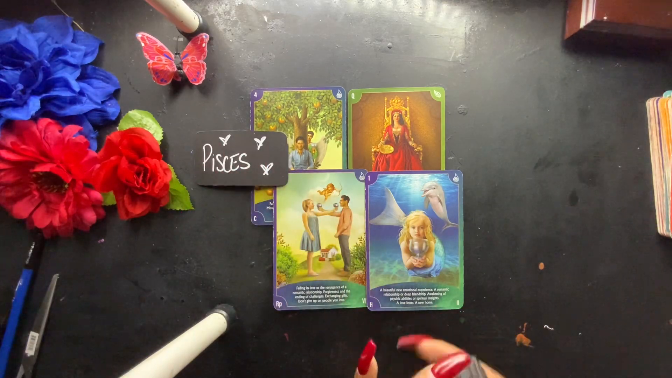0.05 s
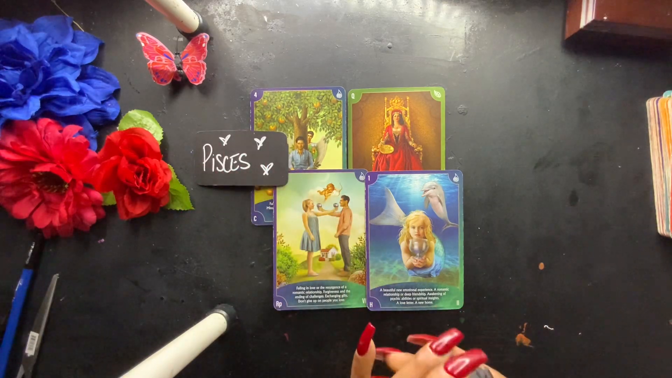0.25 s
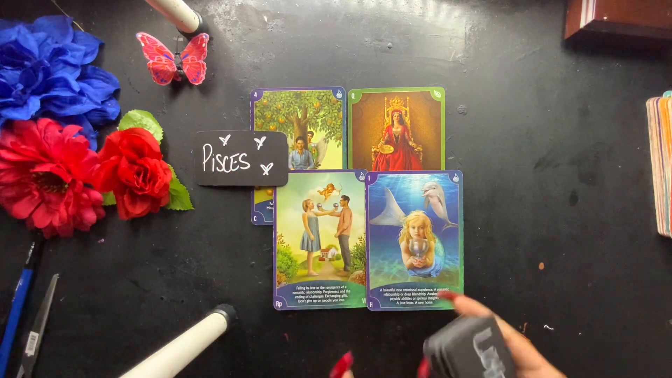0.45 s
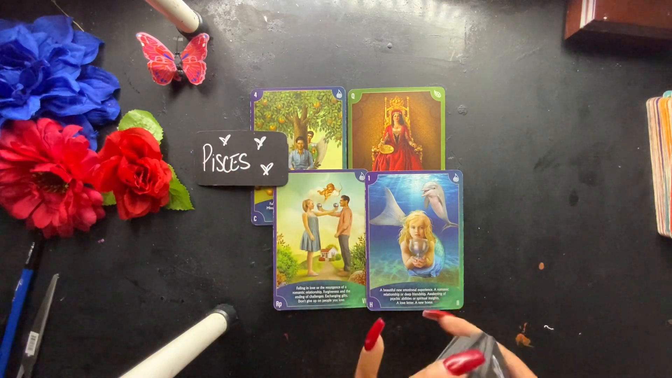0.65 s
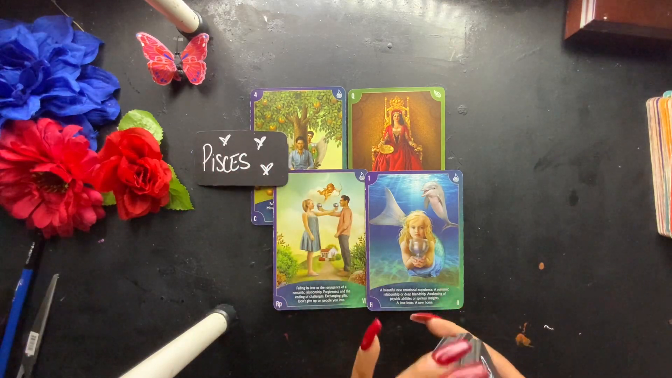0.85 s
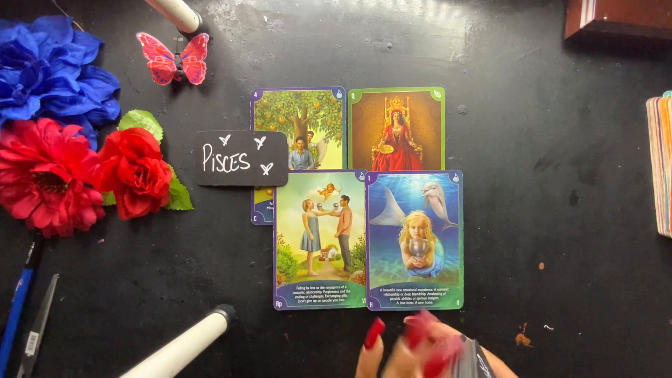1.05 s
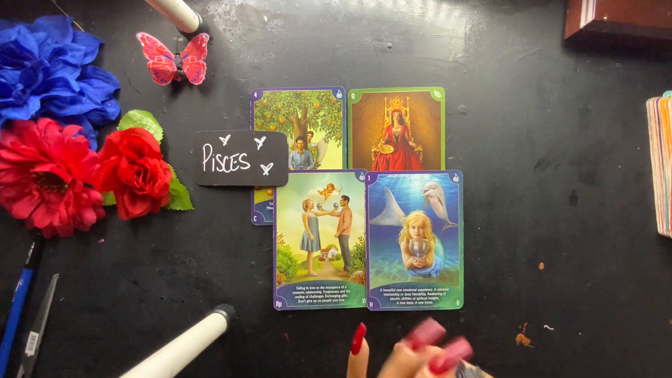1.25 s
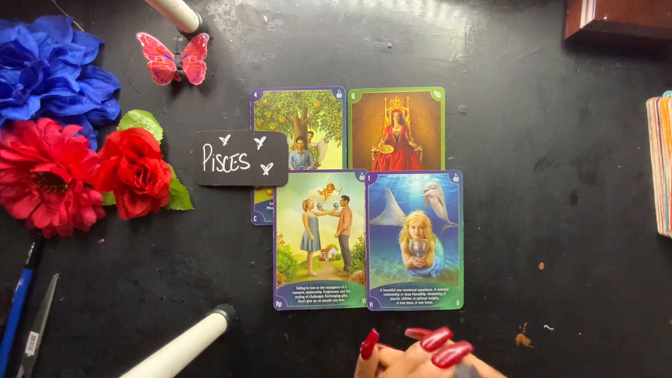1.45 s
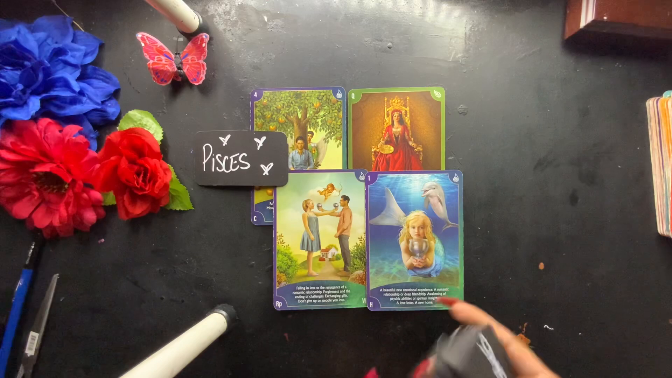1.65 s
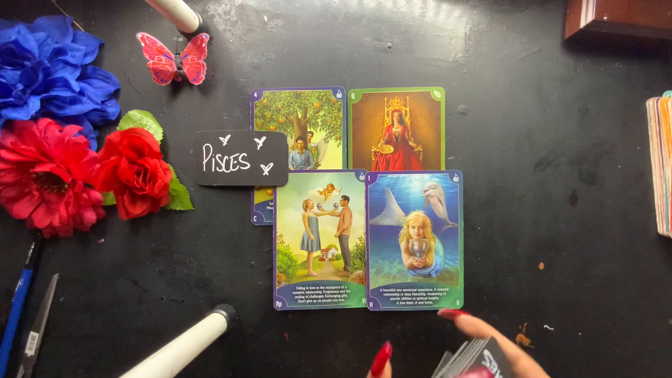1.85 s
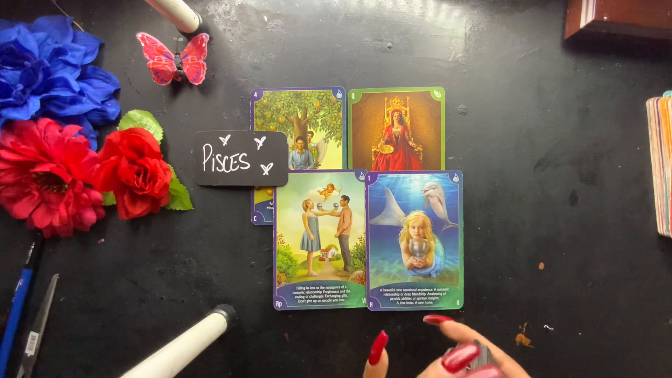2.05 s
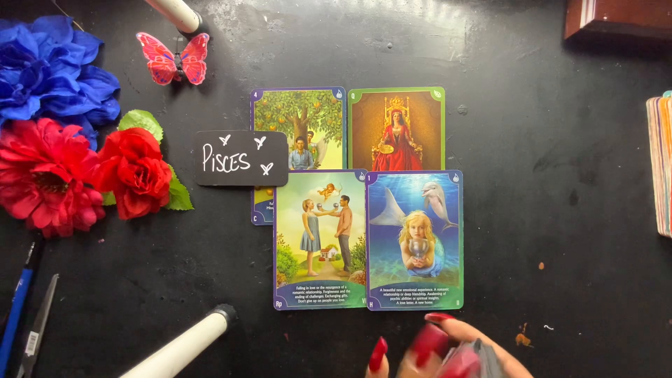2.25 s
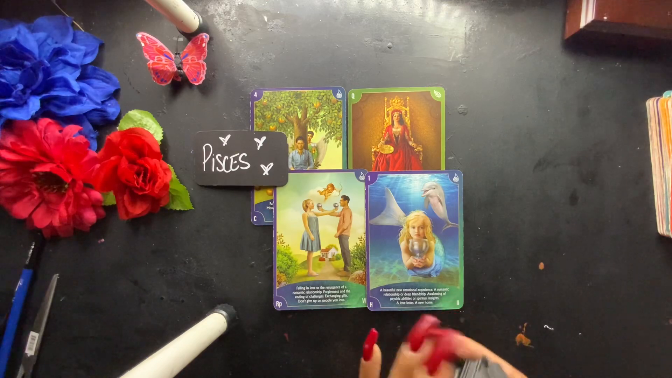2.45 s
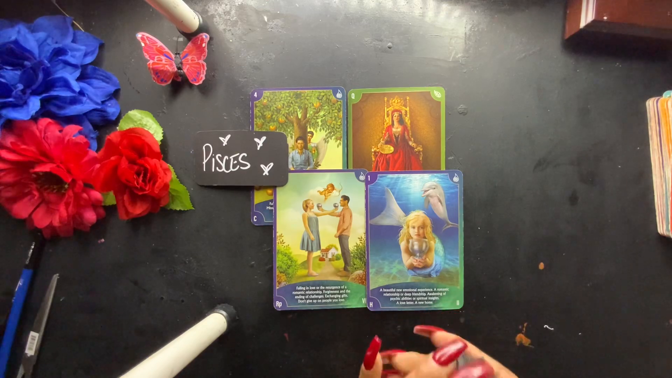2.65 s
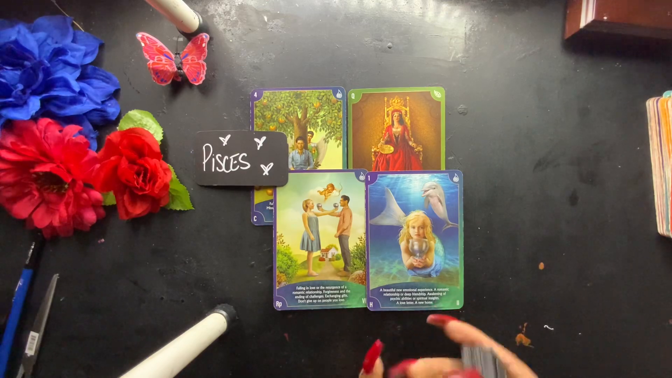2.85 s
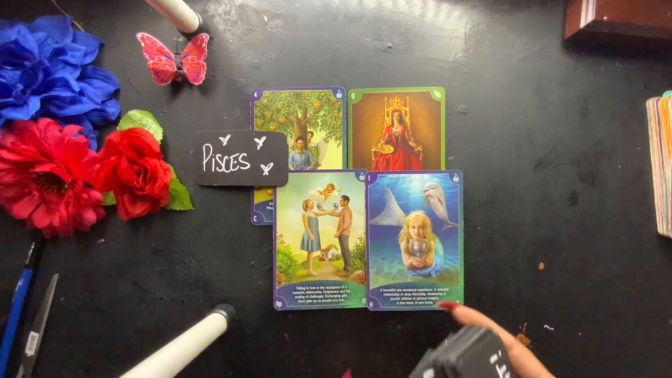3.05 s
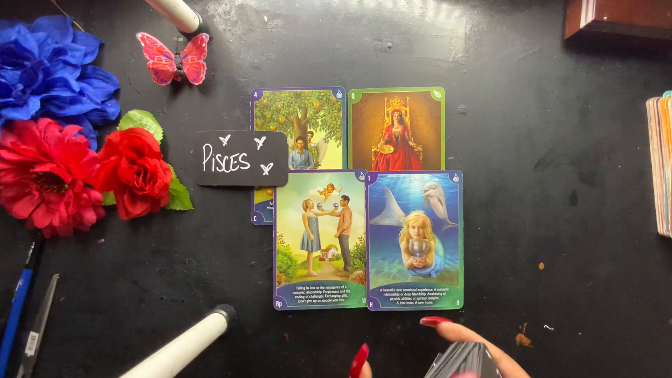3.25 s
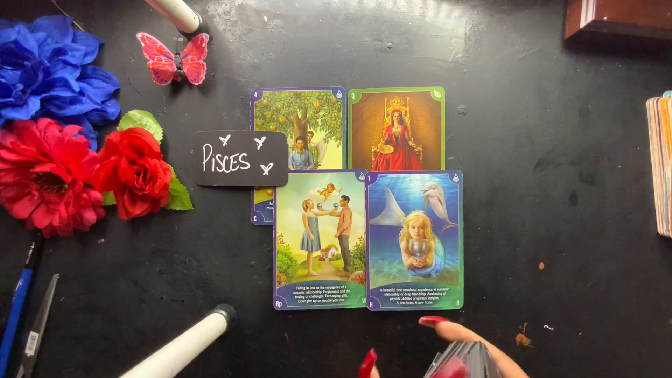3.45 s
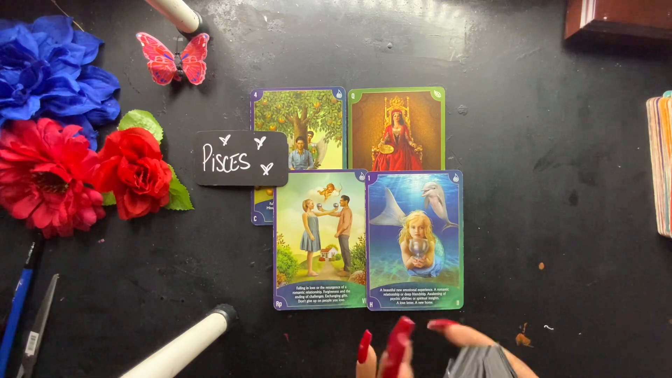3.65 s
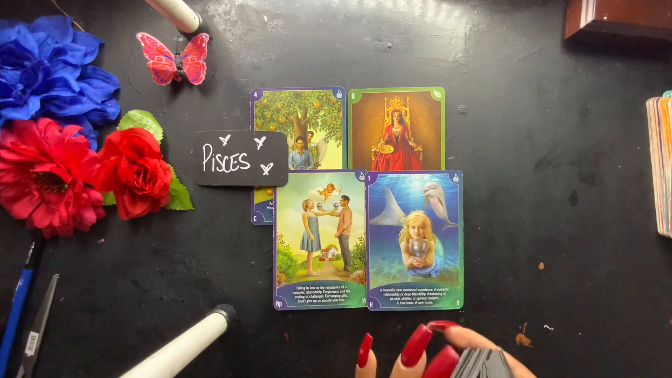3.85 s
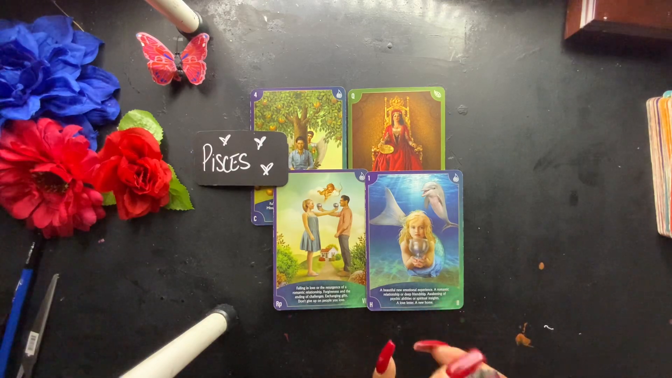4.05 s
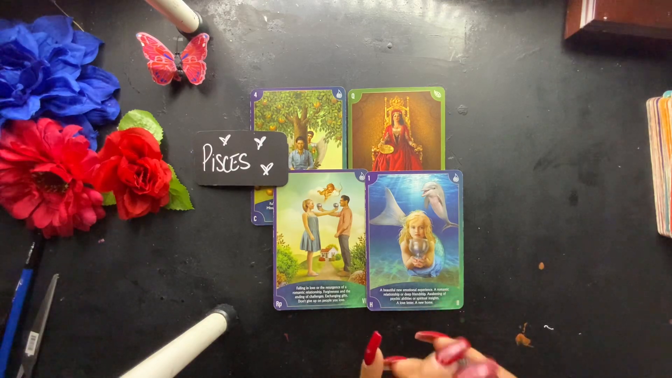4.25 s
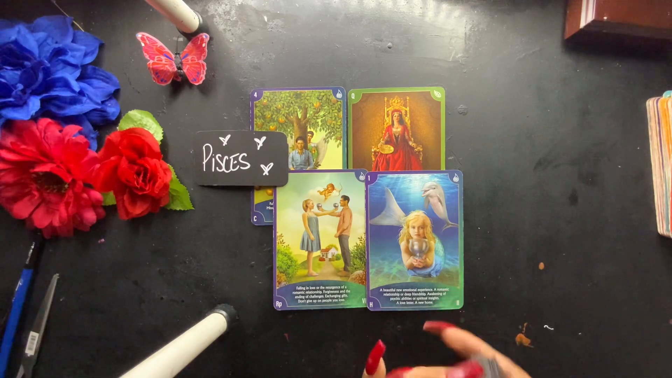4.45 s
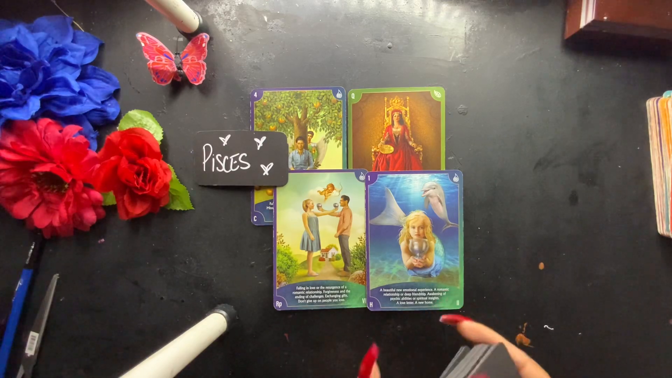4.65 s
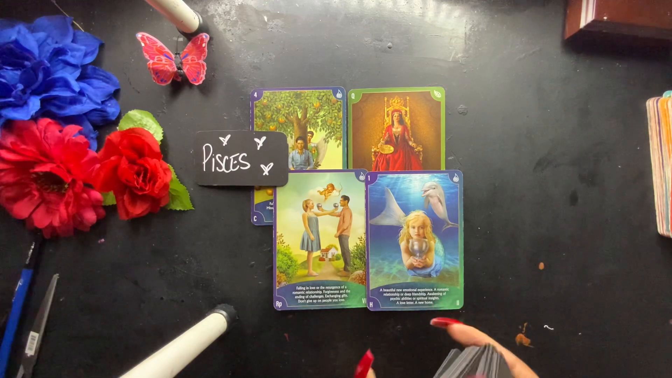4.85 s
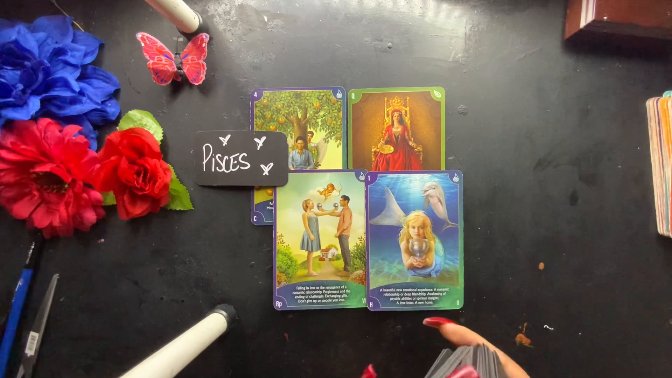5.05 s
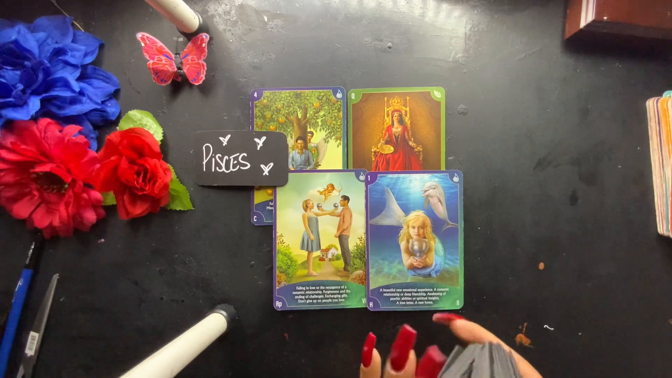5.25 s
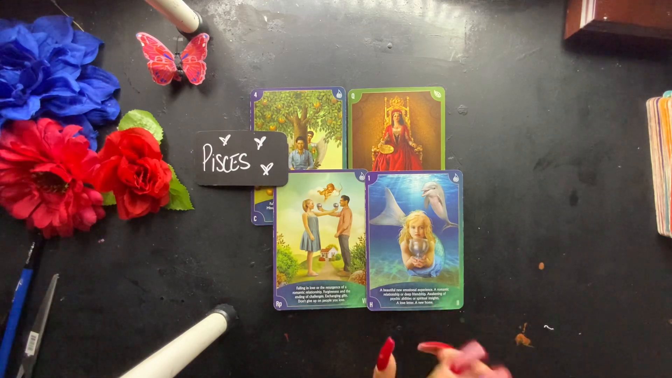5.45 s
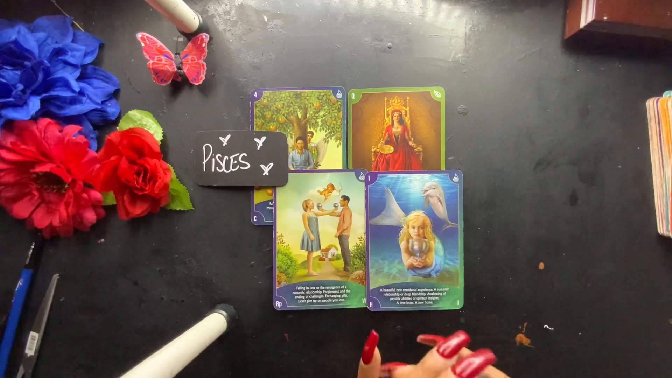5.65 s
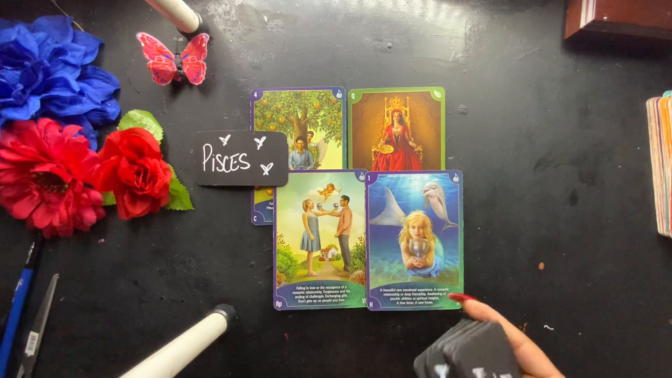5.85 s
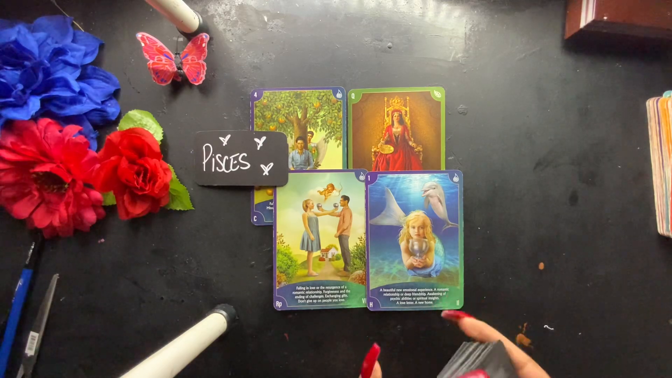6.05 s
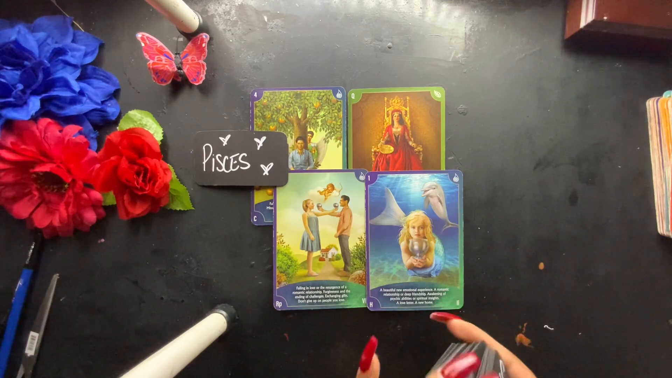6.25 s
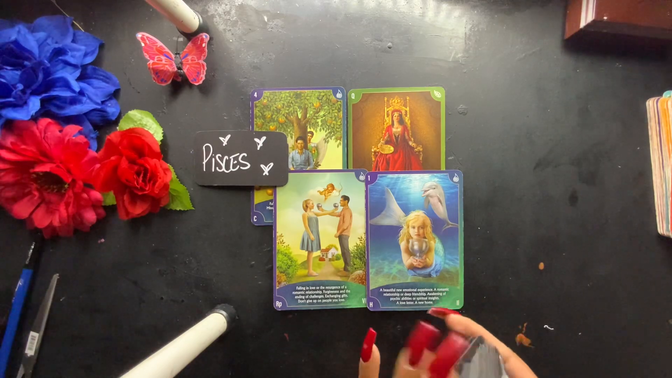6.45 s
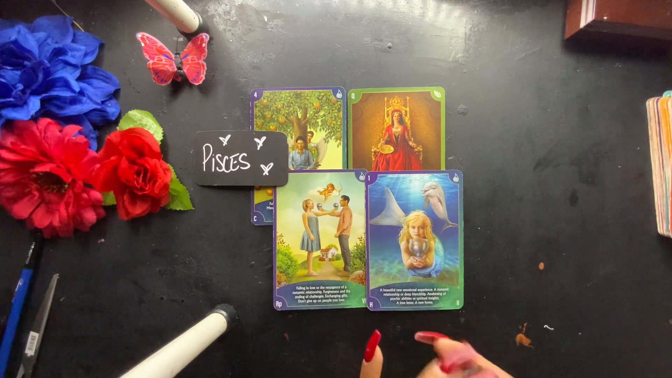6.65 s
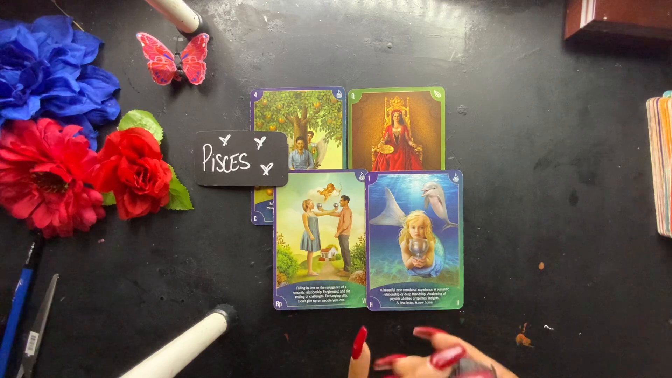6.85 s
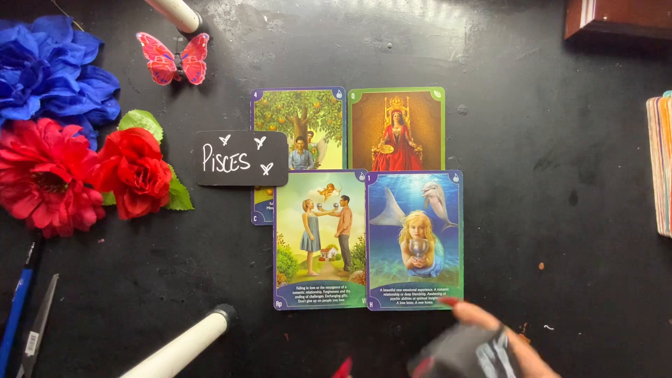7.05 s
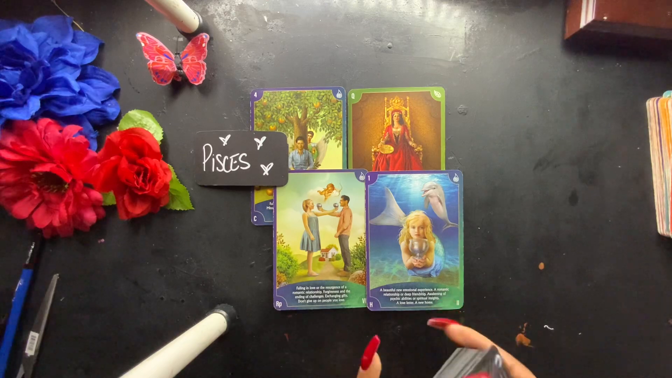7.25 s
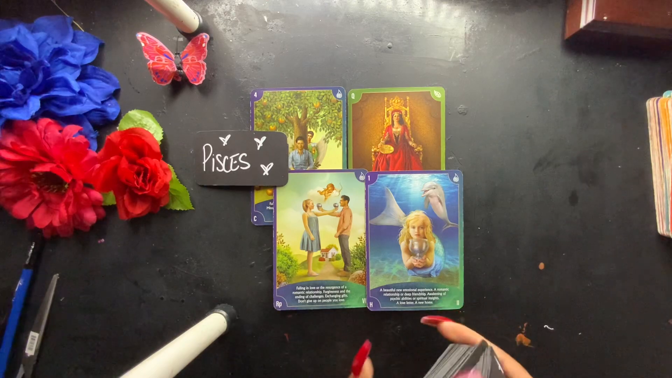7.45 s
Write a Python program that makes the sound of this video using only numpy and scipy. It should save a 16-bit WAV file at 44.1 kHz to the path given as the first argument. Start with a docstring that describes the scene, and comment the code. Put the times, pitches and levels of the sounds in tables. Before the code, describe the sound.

Close stereo pickup of a thick deck of coated cards shuffled overhand in a small quiet room. Faint skids and knocks come first, then short swishing draws end in crisp woody slaps, strongest near 1.7, 2.9, 4.5, 5.9, 6.0 and 7.1 seconds. Softer rasps, ticks and taps fill the gaps. The room answers briefly over a very low, steady rumble.

```python
"""Over a low rumble a packet of cards skids and knocks faintly; a thick deck is then shuffled overhand
just below a phone in a quiet room. Packets sliding over each other hiss and rasp (coloured noise) and slap
into the palm (noise bursts, a short sine knock of trapped air, a low thud). The small room answers briefly
(one reflection and a noise tail). The phone builds the treble of both sides from one signal."""
import sys
import numpy as np
from scipy import signal
from scipy.fft import rfft, irfft, next_fast_len
from scipy.io import wavfile
from scipy.ndimage import uniform_filter1d

SR = 44100
rng = np.random.default_rng(int(sys.argv[2]) if len(sys.argv) > 2 else 0)


def unload_wav(signal):
    """Save mono or channel-first audio to the path in sys.argv[1] as 16-bit WAV at rate SR, clipped to [-1, 1]."""
    wavfile.write(
        sys.argv[1],
        SR,
        np.round(np.clip(np.atleast_2d(signal).T, -1, 1) * 32767).astype(np.int16),
    )


def ratio(d):
    """dB to gain"""
    e = np.asarray(d, float) / 20
    return 10 ** e


N = 331014

# standing waves of the room: (frequency [Hz], width at -6 dB [Hz], level [dB])
ROOM_MODES = [(54.3, 21, 2), (71, 6.9, 1), (99.7, 21, -2.5), (146.6, 24.7, -1.5), (201.4, 40, -11),
              (254.2, 44, -6.5), (294, 22, -8.5), (350, 38, -19), (421.4, 42, -17)]
# colour of the faint air noise: (frequency [Hz], gain [dB])
AIR_COLOUR = [(90, -11.5), (250, 12), (330, 19), (430, 17), (500, 17.5), (650, 18.5), (900, 10.5),
              (1500, -2), (2200, -12), (4000, -2.5), (8000, -24), (16000, -23.5)]
RUMBLE_DB, AIR_DB = -62.5, -80

# packet drawn or nudged along the deck, rise and fall over 20 dB:
# (peak time [s], hiss level [dB], rise [ms], fall [ms], rasp relative to hiss [dB])
STROKES = [(0.217, -52, 69, 18, -3.5), (0.39, -39.5, 32.5, 22, -4.5), (0.914, -56, 88, 52, -0.5),
           (1.042, -42.5, 37, 37, -6.5), (1.432, -55, 23, 38, -3), (1.652, -39.5, 49, 14, -4.5),
           (2.28, -49.5, 14.5, 31, -4.5), (2.902, -35.5, 37.6, 15, -7), (3.293, -53, 75, 240, -0.5),
           (3.405, -56.5, 140, 110, -4.5), (3.519, -57, 34, 15, 9), (3.697, -48.5, 48, 100, -2),
           (3.815, -57, 130, 56, -1), (3.94, -56.5, 44, 130, 3), (4.159, -51.5, 92, 60, -6.5),
           (4.233, -55.5, 47, 79, -0.5), (4.488, -41, 52, 46, -7), (4.995, -54, 240, 70, -6),
           (5.119, -43.5, 58, 46, 0), (5.39, -52, 32, 48, -5), (5.641, -56, 67, 44, -1.3),
           (5.706, -59.5, 18, 72, -2.5), (5.84, -34, 45, 13, -8.5), (6.468, -50.5, 64, 38, -2.5),
           (6.861, -56, 42, 67, 3), (7.053, -34, 47, 14, -3)]
# landed packet skids into place, fade over 20 dB:
# (start [s], hiss level [dB], hold [ms], fade [ms], rasp relative to hiss [dB])
SKIDS = [(0.001, -59, 23, 208, 0), (0.598, -44, 18, 68, 2.7), (0.797, -58.5, 39, 49, 5.5),
         (1.846, -43, 18, 81, 0.2), (2.002, -55, 125, 80, 0.5), (2.249, -56, 1.9, 14, 2.5),
         (3.087, -48, 47, 67, 2.2), (4.679, -42, 8.6, 125, 1.5), (4.873, -54, 11, 134, 6.5),
         (6.021, -45.5, 33.6, 61, 0.5), (6.218, -57, 105, 38, 0.5), (7.246, -43, 10, 98, 1),
         (7.457, -53, 3.9, 139, 3.5)]
SKID_RISE_MS = 4
# fingers keep the deck lightly moving: (start [s], end [s], hiss level [dB])
HANDLING = [(0.267, 0.36, -74), (0.747, 0.787, -63), (0.978, 1.03, -63), (1.237, 1.444, -64),
            (1.518, 1.595, -74), (2.422, 2.455, -75.5), (2.503, 2.706, -61), (2.778, 2.85, -65),
            (3.53, 3.66, -71), (3.92, 4.134, -64), (4.347, 4.434, -71.5), (5.43, 5.622, -63.5),
            (6.134, 6.234, -65.5), (6.388, 6.42, -68), (6.559, 6.546, -70.5), (6.638, 6.816, -62.5),
            (6.947, 7.02, -63), (7.398, 7.464, -61)]
HANDLING_EDGE_MS, HANDLING_RASP_DB, HANDLING_WAVER_DB = 46, -0.5, 1.5
# loose cards rasp on after a landing: level relative to the knock, fade over 20 dB
SETTLE_DB, SETTLE_MS = -36.5, 110
# colour of the sliding hiss: (frequency [Hz], gain [dB])
HISS_COLOUR = [(200, -42), (500, -10.5), (1000, -28), (1500, -31), (3000, -1), (4200, 1), (6000, 6.5),
               (8000, 4.5), (11000, 6.5), (14000, 2.5), (15600, 2.5), (16000, -24)]
# colour of the lower rasp: (frequency [Hz], gain [dB])
RASP_COLOUR = [(200, -33), (500, -13), (900, -20), (1450, 0), (2000, -4.5), (2650, -5.5), (3300, -4),
               (4500, -17)]

# packets landing: (time [s], knock peak [dB], knock frequency [Hz],
# crack relative to knock [dB], thump relative to knock [dB])
SLAPS = [(0.023, -46.5, 1530, -3, -24.5), (0.426, -38, 1525, -4.5, -3.5), (0.597, -33, 1670, -5.5, 3.5),
         (0.795, -35, 1670, 0, 8), (1.627, -49.5, 1440, 4, -17), (1.679, -14, 1484, -5, -8),
         (1.848, -21, 1537, -19.5, -6.5), (2.051, -31.5, 1510, -14, -2.5), (2.246, -59.5, 1630, 6.5, -9),
         (2.889, -48.5, 1440, -5.5, -14), (2.908, -24, 1540, -13, -10.5), (2.911, -25, 1580, -17, -14),
         (2.936, -17, 1294, 1.5, -1.5), (3.103, -31, 1510, -6.5, 3.5), (3.301, -43, 1570, 0, -14),
         (3.504, -47, 1520, -1, 5), (3.514, -37.5, 1920, -20, 2.5), (3.616, -43.5, 1600, -6.5, 1.5),
         (3.821, -49.5, 1400, 1.5, 5.5), (3.862, -53, 1530, -3, 4), (4.496, -27, 1450, -12.5, -7),
         (4.505, -26, 1480, -20.5, -13.5), (4.5266, -14, 1397, -5, -10.5), (4.677, -37.5, 1600, 9.5, 6.5),
         (4.683, -40.5, 1375, -10.5, 6), (4.88, -36, 1490, -14, -2.5), (5.085, -44.5, 1620, -1, -3),
         (5.105, -38, 1550, -11, -10), (5.11, -31.5, 1496, -18, -2), (5.121, -35, 1560, -12, -10),
         (5.863, -11, 1434, -10.5, -11), (6.028, -13.5, 1520, -17.5, -15.5),
         (6.221, -27.5, 1570, -17.5, -5), (6.273, -44, 1360, -11, -0.5), (7.017, -45, 1460, -12.5, -5),
         (7.076, -14.5, 1500, -5, -6), (7.219, -43, 1670, 4, 12.5), (7.248, -30, 1465, -7.5, -3.5),
         (7.256, -33, 1470, -12, -3), (7.456, -32.5, 1500, -10, -1)]
# colour of the edge clicks: (frequency [Hz], gain [dB])
CRACK_COLOUR = [(200, -41), (400, -0.5), (700, -15), (1500, -12.5), (2500, 1.5), (4200, 1), (6000, -2.5),
                (8000, -5.5), (11000, -4), (14000, -11.5), (16000, -31)]
# colour of the thump when the knock is at 1500 Hz: (frequency [Hz], gain [dB])
THUMP_COLOUR = [(300, -21), (500, -17.5), (900, -4.5), (1450, -1.5), (2100, -4), (2650, -4.5), (3200, -4),
                (4500, -27)]
# inverted share of the thump on the left: (frequency [Hz], gain [dB])
LEFT_THUMP = [(400, -26.5), (800, -12), (1200, -13.5), (2000, -12.5), (3500, -17)]
# share of the thump's low end in step on the left: (frequency [Hz], gain [dB])
LEFT_LOW_THUMP = [(300, -1), (550, -9), (900, -24)]
# palm thud: level relative to the knock, and its ceiling
THUD_UNDER_DB, THUD_CAP_DB = -22, -52

# colour of the room's diffuse tail: (frequency [Hz], gain [dB])
TAIL_COLOUR = [(100, -43.5), (350, 2), (800, 3), (1500, -5.5), (2500, 0.5), (5000, -9.5), (15000, -5.5)]

# the phone
TREBLE_LAG_S, TREBLE_TURN_RAD = .000661, -1.3
SPLIT_HZ, SPLIT_ORDER = 3700, 12
BASS_CUT_HZ = 45


def colour(x, points):
    """Zero-phase filter through (frequency [Hz], gain [dB]) points."""
    size = next_fast_len(x.shape[-1])
    hz, db = np.transpose(points)
    bin_hz = np.fft.rfftfreq(size, 1 / SR) + 1
    gain = ratio(np.interp(np.log(bin_hz), np.log(hz), db))
    return irfft(rfft(x, size) * gain, size)[..., :x.shape[-1]]


def unit(x):
    """Scale to rms 1."""
    return x / np.sqrt(np.mean(x ** 2))


def walk(rate_hz):
    """Random levels held 1 / rate_hz s and slewed twice; rms 1."""
    hold = int(SR / rate_hz)
    steps = np.repeat(rng.standard_normal(N // hold + 1), hold)
    slewed = uniform_filter1d(uniform_filter1d(steps, hold), hold)
    return unit(slewed[:N])


def rumble():
    """House rumble rings the low room modes, bass alike on both sides, over a faint air noise."""
    size = next_fast_len(N)
    hz = np.fft.rfftfreq(size, 1 / SR)
    power = sum(ratio(2 * db) / (1 + (2 * (hz - mode_hz) / width_hz) ** 2) ** 2
                for mode_hz, width_hz, db in ROOM_MODES)
    noise = rng.standard_normal((2, size))
    mid, side = unit(irfft(rfft(noise) * np.sqrt(power), size)[:, :N])
    side = colour(side, [(40, -31), (90, -22), (180, -17), (350, -7), (700, -1)])
    air = unit(colour(rng.standard_normal((2, N)), AIR_COLOUR))
    level = ratio(RUMBLE_DB + 1.0 * walk(1.6))
    return level * np.array([mid + side, mid - side]) + ratio(AIR_DB) * air


def swell_db(start_s, end_s, db, rise_ms, fall_ms):
    """Level that climbs to db, holds from start to end and falls; rise and fall span 20 dB."""
    t = np.arange(N) / SR
    before_s, after_s = np.maximum(start_s - t, 0), np.maximum(t - end_s, 0)
    return db - 20000 * (before_s / max(rise_ms, 1) + after_s / max(fall_ms, 1))


def rubbing():
    """Power of the hiss and of the rasp, summed over all the ways the cards move."""
    hiss, rasp = np.full((2, N), 1e-11)
    waver_db = HANDLING_WAVER_DB * walk(25)
    moves = []
    for s, db, rise_ms, fall_ms, rasp_db in STROKES:
        moves.append((swell_db(s, s, db, rise_ms, fall_ms), rasp_db))
    for s, db, hold_ms, fade_ms, rasp_db in SKIDS:
        moves.append((swell_db(s, s + hold_ms / 1000, db, SKID_RISE_MS, fade_ms), rasp_db))
    for s, end_s, db in HANDLING:
        level_db = swell_db(s, end_s, db, HANDLING_EDGE_MS, HANDLING_EDGE_MS) + waver_db
        moves.append((level_db, HANDLING_RASP_DB))
    for level_db, rasp_db in moves:
        power = ratio(2 * level_db)
        hiss = hiss + power
        rasp = rasp + power * ratio(2 * rasp_db)
    for s, knock_db, *_ in SLAPS:
        rasp = rasp + ratio(2 * swell_db(s, s, knock_db + SETTLE_DB, SKID_RISE_MS, SETTLE_MS))
    return hiss, rasp


def slide(grip_db=2.3, patch_db=1.4, left_rasp_db=-12, gap_db=3.0, round_ms=4):
    """Coated faces rub: patchy dense noise, and a lower rasp with stray edge ticks, mostly on the right."""
    hiss_db, rasp_db = (uniform_filter1d(10 * np.log10(power), int(round_ms * SR / 1000))
                        for power in rubbing())
    # lower and upper treble catch at different moments
    bands = [[(5000, 0), (7000, -3), (10000, -12), (16000, -30)],
             [(2500, -30), (5000, -12), (7000, -3), (10000, 0)]]
    grain = sum(colour(rng.standard_normal(N), band) * ratio(patch_db * walk(40)) for band in bands)
    hiss = unit(colour(grain, HISS_COLOUR)) * ratio(hiss_db + grip_db * walk(300))

    ticks_per_s, tick_db = 60, 15
    ticks = (rng.random(N) < ticks_per_s / SR) * ratio(tick_db + 3.5 * rng.standard_normal(N))
    # the two gaps between the packets are excited unevenly
    gaps = [[(1800, 0), (2400, -20)], [(1800, -20), (2400, 0)]]
    scrape = sum(colour(rng.standard_normal((2, N)) + ticks, gap) * ratio(gap_db * walk(30))
                 for gap in gaps)
    rasp = unit(colour(scrape, RASP_COLOUR)) * ratio(rasp_db)
    return np.array([hiss + ratio(left_rasp_db) * rasp[0], rasp[1] - 0.27 * hiss])


def slaps(swell_ms=0.98, late_ms=0.61, ring_ms=1.44, rise_ms=0.7, fall_ms=3.41,
          palm_hz=280, palm_ms=6.2, left_knock_db=-26):
    """Each landing: edge crack, broad thump, a few cycles of the squeezed air pocket, a palm thud."""
    length, lead = 4096, 1024  # samples
    out = np.zeros((2, N + length))
    ms = (np.arange(length) - lead) / SR * 1000
    after_ms = np.maximum(ms, 0)
    burst = (1 - np.exp(-after_ms / rise_ms)) * np.exp(-after_ms / fall_ms)
    burst_rms = np.sqrt(np.mean(burst ** 2))
    # the pocket closes gradually: the knock swells over a few cycles, then dies with the blow
    spread_ms = np.where(ms < late_ms, swell_ms, ring_ms)
    swell = np.exp(-.5 * ((ms - late_ms) / spread_ms) ** 2)
    thud_swell = np.e * after_ms / palm_ms * np.exp(-after_ms / palm_ms)
    noises = rng.standard_normal((len(SLAPS), 2, length))
    for (s, db, hz, crack_db, thump_db), noise in zip(SLAPS, noises):
        crack = ratio(db + crack_db) * burst_rms * unit(colour(noise[0] * burst, CRACK_COLOUR))
        # a larger pocket lowers the knock and the whole thump with it
        thump_colour = THUMP_COLOUR * np.array([(hz / 1500) ** 1.5, 1])
        thump = ratio(db + thump_db) * burst_rms * unit(colour(noise[1] * burst, thump_colour))
        # random phase
        knock = ratio(db) * swell * np.sin(2 * np.pi * (hz * ms / 1000 + noise[0, 0]))
        # a heavier packet moves more of the hand, so it thuds lower, with some scatter
        thud_hz = palm_hz * ratio(-.2 * (db + 26.5) + 1.6 * noise[1, 0])
        thud_level = ratio(min(db + THUD_UNDER_DB, THUD_CAP_DB))
        thud = thud_level * thud_swell * np.sin(2 * np.pi * thud_hz * after_ms / 1000)
        # the left side catches a weak, inverted share of the mid range
        left = crack - ratio(left_knock_db) * knock
        left = left - colour(thump, LEFT_THUMP) + colour(thump, LEFT_LOW_THUMP)
        right = knock + thump - 0.15 * crack
        both = np.array([left, right]) + thud
        start = int(s * SR) - lead
        out[:, max(start, 0):start + length] += both[:, max(-start, 0):]
    return out[:, :N]


def room(x, t60_s=0.24, wet_db=-14, near_s=0.0086, near_db=-18):
    """One near reflection, and a diffuse tail that differs between the sides."""
    t = np.arange(SR // 2) / SR
    decay = np.exp(-np.log(1000) * t / t60_s)
    onset = 1 - np.exp(-(t / 0.0021) ** 2)
    tail = colour(rng.standard_normal((2, len(t))), TAIL_COLOUR) * decay * onset
    tail = ratio(wet_db) * tail / np.sqrt(np.sum(tail ** 2) / 2)
    tail[:, int(near_s * SR)] += ratio(near_db) * np.array([.6, 1])
    feed = np.array([x[0] - 0.21 * x[1], x[1] - 0.17 * x[0]])
    return x + signal.fftconvolve(feed, tail, axes=1)[:, :N]


def scene():
    """Cards in the room over the rumble."""
    return rumble() + room(slide() + slaps())


def top_cut(x):
    """Nothing passes above the cut-off."""
    return signal.sosfilt(signal.butter(12, 16940, fs=SR, output="sos"), x)


def record(dry):
    """Above the split the right side is the left one, slightly late and turned in phase; deep bass is cut."""
    size = next_fast_len(N)
    hz = np.fft.rfftfreq(size, 1 / SR) + 1
    left, right = rfft(dry, size) / np.sqrt(1 + (BASS_CUT_HZ / hz) ** 6)
    share = 1 / (1 + (SPLIT_HZ / hz) ** SPLIT_ORDER)
    turned = left * np.exp(1j * (TREBLE_TURN_RAD - 2 * np.pi * hz * TREBLE_LAG_S))
    right = np.sqrt(1 - share) * right + np.sqrt(share) * turned
    mix = irfft(np.array([left, right]), size)[:, :N]
    return top_cut(mix)


dry = scene()
out = record(dry)
unload_wav(out)
```